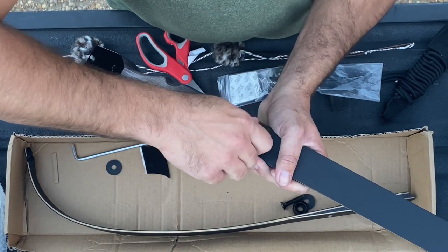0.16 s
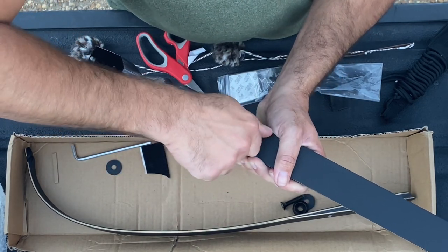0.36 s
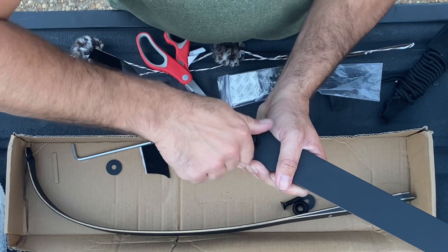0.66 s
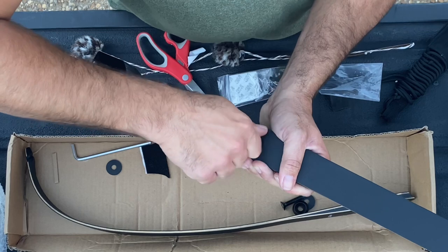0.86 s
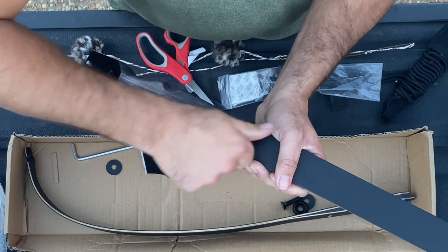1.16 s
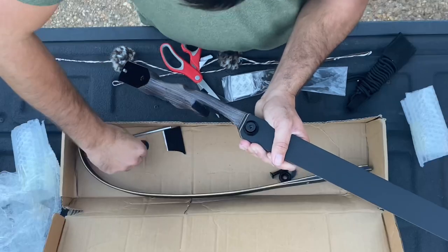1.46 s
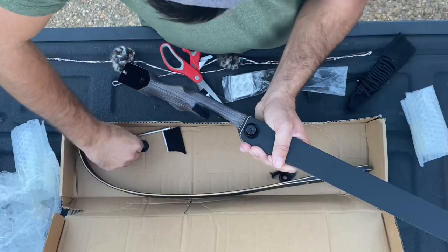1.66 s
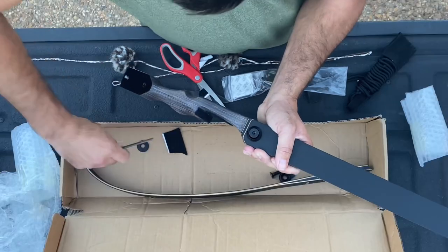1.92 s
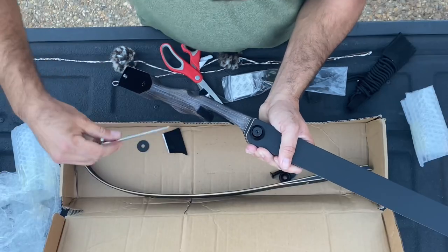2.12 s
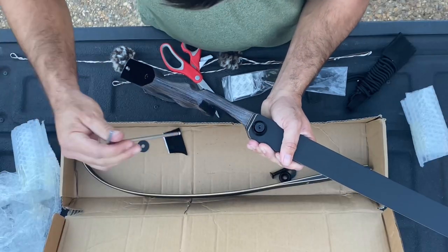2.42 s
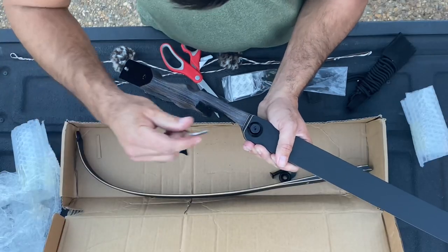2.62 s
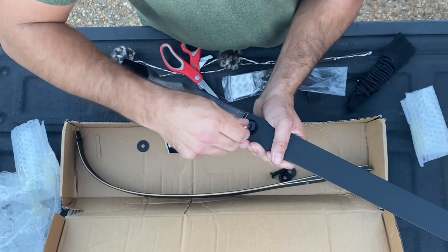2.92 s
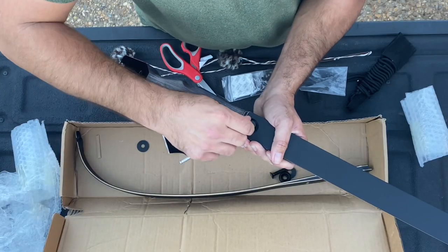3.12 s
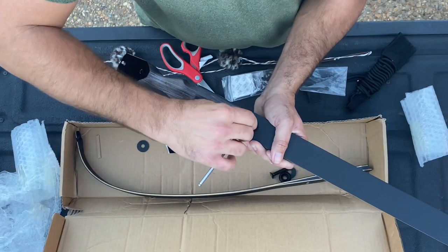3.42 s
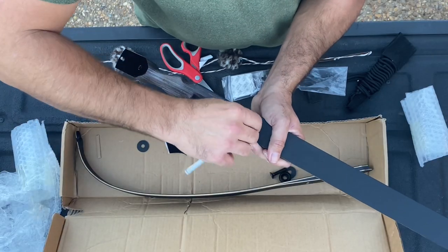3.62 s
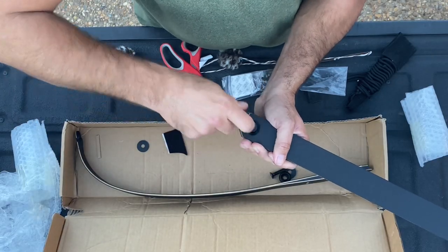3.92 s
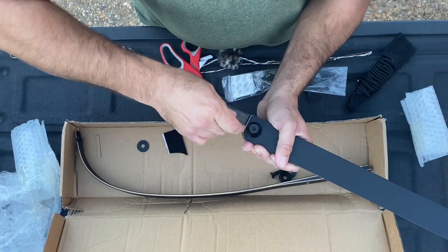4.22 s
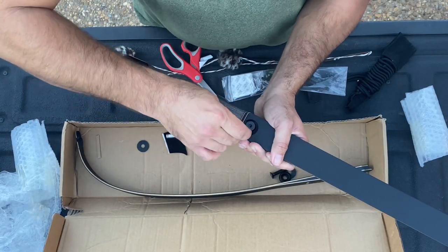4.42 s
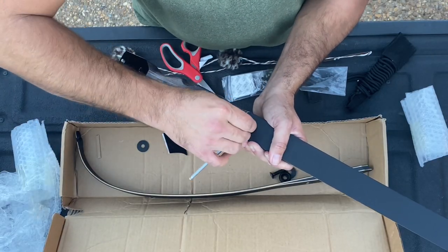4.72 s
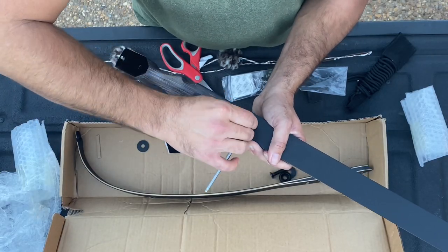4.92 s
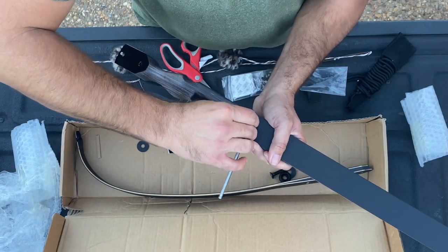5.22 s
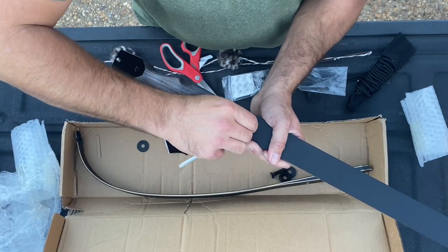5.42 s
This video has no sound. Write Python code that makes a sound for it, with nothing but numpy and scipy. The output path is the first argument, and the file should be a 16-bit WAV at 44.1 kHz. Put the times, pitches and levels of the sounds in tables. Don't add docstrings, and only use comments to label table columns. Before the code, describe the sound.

Beneath everything, a soft low traffic roar with electrical hum and a remote engine slowly rising in pitch, strongest past the middle. Near the phone microphone, a steel bolt taps and scrapes, cardboard thumps and rustles, then a small hex wrench seats with bright clicks, bites once hard, skips and gives faint last ticks. Open air, almost no reverberation, stereo.

```python
import sys
import numpy as np
from scipy import signal
from scipy.fft import rfft, irfft, next_fast_len
from scipy.io import wavfile
from scipy.ndimage import uniform_filter1d, map_coordinates

SR = 44100
rng = np.random.default_rng(int(sys.argv[2]) if len(sys.argv) > 2 else 0)


def store_wav(level_fs):
    pcm = np.round(np.clip(np.atleast_2d(level_fs), -1, 1) * 32767)
    wavfile.write(sys.argv[1], SR, pcm.T.astype(np.int16))


def linear_from_db(decibels):
    return 10 ** (np.asarray(decibels, float) / 20)


N = 245725

# start_s, peak_db, knock_db, ring_db, rattle_t60_s
BOLT_TAPS = [
    (0.2988, -38.5, 2.5, -4, 0.024),
    (0.3311, -51, -4.5, -19, 0.017),
    (.349, -64, -8, -10, .012),
    (0.4474, -60.5, 6, -15, 0.016),
]
BOX_TAPS = [(1.3962, -44.5, 5.5, -14, 0.004), (1.3985, -49.5, 14, -18, .004),
            (1.4085, -48, 12, -9.5, 0.012), (1.418, -54, 2, -4.5, .008), (1.4255, -56, 0, -4, .008),
            (1.4385, -57.5, -2, -1.5, .008), (1.4475, -57.5, -2, 4, .008), (1.4761, -59.5, -10, -10, 0.012),
            (1.482, -58, -6, -8, .01), (1.491, -60, 0, -3, .008), (1.5095, -51, -7, -2, 0.014),
            (1.5128, -43, 8.5, -2.5, 0.013), (1.5195, -56.5, 2.5, -3, .008),
            (1.582, -51.5, -10, -5.5, 0.016), (1.5858, -41.5, 2.5, -7, 0.013),
            (1.5925, -52.5, 13.5, -18.5, 0.007), (1.639, -54.5, 7, -6, 0.005)]
SEAT_TAPS = [
    (2.997, -62, -9, -1, 0.012),
    (3.0024, -36, -13.5, 4.5, .005),
    (3.0038, -36, -8, 3.5, 0.0074),
    (3.0125, -64, -7, 1, .008),
    (3.018, -55, -10.5, 0, .008),
    (3.0335, -59, -2, -10, .01),
    (3.7678, -65.5, 6.5, -8.5, 0.019),
]
TURN_TAPS = [
    (3.0605, -66, 3, -23, 0.0103),
    (3.067, -61, 2, -17.5, .008),
    (3.072, -62, 4, -15, .008),
    (3.0751, -44.5, 2.3, 15, 0.0022),
    (3.0764, -38.5, 2.5, 8, 0.0088),
    (3.0885, -58.5, 3.3, 4, 0.011),
    (3.095, -64, 2, 1, .01),
]
BITE_TAPS = [
    (4.5439, -34.5, -8.5, -5, 0.014),
]
SLIP_TAPS = [
    (4.8388, -50, -3, 1.5, 0.011),
    (4.8418, -57, 6, 0, .008),
    (4.8452, -47, 5.5, -10, 0.0079),
    (4.8485, -51, 3, -4, .008),
]
CATCH_TAPS = [
    (4.575, -68, 2, -8, .02),
    (4.5862, -64, 8.5, -10, .02),
    (4.597, -65, 7, -8, .015),
    (4.6555, -67, -20, -28, 0.015),
    (4.7922, -69, -8, -10, .02),
    (4.8027, -68, -12, -20, 0.015),
    (5.2038, -67.5, 13.5, -4.5, 0.019),
    (5.211, -58, -7.5, -17, 0.014),
    (5.223, -73, 3, -18.5, 0.024),
]
LOOSE_TAPS = [
    (0.8415, -49.5, -10, -35, 0.006),
    (.8462, -51.5, 0, -38, 0.0072),
    (0.8505, -59, 11, -38, 0.014),
    (1.0400, -61, 9, 4, 0.0068),
    (1.0455, -68, 19, -20, 0.014),
    (1.051, -72.5, 20, -22, 0.016),
]
# pitch_hz, width_hz, level_db
BOLT_MODES = [(916, 82, -5.5), (1650, 118, 0), (1835, 87, -6.5), (2097, 115, -4), (3000, 140, -11),
              (3710, 450, -11), (5180, 200, -15.5), (5730, 250, -16.5), (7130, 330, -24.5),
              (8430, 180, -15.5), (10660, 400, -23.5)]
BOX_MODES = [(744, 180, 2.5), (830, 270, 5.5), (1436, 220, 5.5), (2025, 180, 0.5), (2610, 180, 9),
             (4000, 490, -1.5), (5800, 830, -10), (7980, 2200, 0), (13860, 2500, -2.5)]
SEAT_MODES = [(1520, 230, -9), (2340, 170, -5), (2600, 80, 0), (3296, 200, -4), (4330, 65, -17),
              (5022, 280, -5.5), (5380, 170, -2.5), (5785, 270, -1.5), (6300, 200, -15), (7000, 130, -9.5),
              (7400, 97, -9), (7650, 70, -3), (8300, 140, 0.5), (10700, 210, -16)]
TURN_MODES = [(1635, 136.6, 0), (1880, 90, -18), (2100, 62, -8), (3020, 82, -18.5), (3650, 170, -4.5),
              (4570, 200, -10.5), (5430, 130, -18), (5830, 220, -12), (7060, 110, -6), (7470, 110, -5),
              (8540, 110, -14), (9800, 190, -8.5), (10900, 200, -15), (12200, 700, -16)]
BITE_MODES = [(1650, 200, 1), (2090, 87, -2), (2540, 88, -2), (3230, 150, -0.5), (3720, 76, -1),
              (4468, 71, -5), (5445, 94, -13), (5696, 220, 0.5), (6270, 190, -5), (6830, 130, -7),
              (7660, 110, -10.5), (8860, 200, -17)]
SLIP_MODES = [(1610, 130, 4.5), (1910, 64, -8), (2570, 88, -6.5), (3050, 200, -8), (3660, 90, -11),
              (4200, 120, -13), (5800, 160, -11), (7020, 130, -17), (7600, 150, -19.5), (9560, 200, -22)]
CATCH_MODES = [(1620, 200, -3), (2000, 250, -4.5), (2600, 200, -3.5), (3070, 250, 0), (3710, 250, -9),
               (5750, 300, -2.5), (6306, 250, -1.5), (7100, 300, -4)]
LOOSE_MODES = [(1288, 220, -13), (1620, 140, -5), (2390, 230, 2), (3300, 630, -7), (4200, 310, -11),
               (5760, 600, 4), (7200, 600, -7)]

# start_s, peak_db, push_t60_s
KNUCKLE_THUDS = [
    (1.397, -42.5, 0.019),
    (1.409, -45, 0.028),
    (1.426, -51, 0.043),
    (1.443, -56, 0.02),
    (1.513, -57, 0.012),
]
LANDING_THUDS = [
    (1.5866, -38, 0.008),
    (1.5935, -39.5, 0.01),
    (1.5995, -40.5, 0.014),
    (1.609, -47, 0.022),
]
# pitch_hz, width_hz, level_db
PANEL_MODES = [(173, 50, 1.5), (210, 8.6, 11), (309, 12, 3), (415, 67, -10), (510, 81, -2.5),
               (716, 80, -2.5), (990, 240, -10.5)]
LANDING_MODES = [(191, 20, 1), (291, 20, 1.5), (412, 50, -6.5), (554, 80, -4.5), (716, 100, -6),
                 (970, 220, -15.5), (1296, 200, -16)]

# start_s, peak_db, pitch_hz, width_hz
PINGS = [(1.5615, -59, 2500, 300), (1.567, -58, 2600, 300), (1.577, -57, 2500, 350),
         (1.5855, -42, 3470, 490), (1.598, -53, 2600, 300), (1.624, -60.5, 2700, 300),
         (1.631, -54.5, 2600, 250), (1.6388, -53.5, 2850, 250), (4.797, -68, 3400, 200),
         (4.8025, -57, 3080, 130), (4.6555, -70, 3100, 150), (1.0405, -50, 1560, 110),
         (1.5868, -44, 1000, 210), (4.5442, -47.5, 3300, 200), (.8755, -57, 5300, 350),
         (.884, -56, 5800, 350), (.387, -55, 5600, 300)]
# start_s, crack_db, crack modes, ring_db, ring mode; modes as pitch_hz, width_hz, level_db
GLINT = (.2986, -42, [(12300, 900, -6), (13900, 700, 0), (15600, 1200, -4)], -45, [(14000, 90, 0)])

# start_s, hold_s, pressure_db, sizzle_over_rub_db, release_s
GRAZE_STROKES = [
    (.078, 0.023, -73, -17, 0.15),
    (.122, 0.03, -76, -9, 0.15),
    (.165, 0.032, -69.5, -20, 0.16),
]
THREAD_STROKES = [
    (.305, 0.068, -70, -5, 0.18),
    (.376, .008, -67.5, 12, 0.047),
    (.388, 0.024, -55, -0.5, 0.059),
    (.43, 0.024, -72, -5.5, 0.24),
]
FINGER_STROKES = [
    (.47, 0.014, -73, -12, 0.22),
    (.54, 0.061, -80.5, -15, 0.18),
    (.63, 0.0091, -73, -31, 0.12),
    (.7, 0.043, -74, -18, .16),
    (.805, 0.0074, -73.5, -19, 0.063),
]
SPIN_STROKES = [
    (.868, 0.012, -60, -34, 0.097),
    (.879, 0.0074, -75.5, 22, 0.074),
    (.9, 0.013, -72, 10, 0.093),
    (.942, 0.05, -78, 10.5, 0.066),
    (.992, 0.012, -63, -8.5, 0.055),
    (1.02, 0.026, -79.5, -4, .15),
]
SLIDE_STROKES = [
    (1.4, 0.049, -54.5, -5, 0.07),
    (1.478, 0.013, -60, -7, 0.1),
    (1.512, 0.0044, -51.5, -5.5, 0.064),
    (1.535, 0.064, -60.5, -19, 0.091),
    (1.59, 0.0078, -66, -7, 0.056),
    (1.625, 0.035, -68, -12.5, 0.12),
]
SOCKET_STROKES = [
    (3.01, 0.0059, -55.5, -2, 0.051),
    (3.026, 0.015, -77, 2, 0.23),
    (3.065, 0.01, -54, -14, 0.1),
    (4.535, .02, -68, -10.5, 0.2),
    (4.588, 0.018, -72, -16, 0.1),
    (4.63, 0.14, -88, -18, .1),
    (4.795, 0.019, -71, -14.5, 0.19),
    (4.852, 0.0024, -65.5, -18, 0.1),
    (5.206, 0.016, -75.5, -26.5, 0.083),
]
SHIVER_STROKES = [
    (3.085, .012, -78, 5.68, 0.23),
]
# pitch_hz, width_hz, level_db
WASHER_RUB = [(1600, 300, -1.5), (3020, 480, 0.5), (3710, 650, -3.5)]
WASHER_SIZZLE = [(5300, 600, -7.5), (6700, 300, -5.5), (7400, 150, 0)]
THREAD_RUB = [(2560, 830, -2), (3420, 340, 2.5), (4030, 760, -4.5)]
THREAD_SIZZLE = [(5530, 500, 1.5), (7630, 1400, -4), (9500, 1800, -7.5), (14200, 1200, -16)]
SKIN_RUB = [(1620, 350, 5.5), (2600, 530, 2.5), (3500, 1000, -8)]
SPIN_RUB = [(2570, 340, 1.5), (3250, 540, 0.5), (3830, 600, 0.5)]
SPIN_SIZZLE = [(5150, 450, -1), (6380, 500, -1.5), (7050, 650, -2.5), (8400, 700, -7.5), (9700, 900, -11.5),
               (14300, 2000, -21)]
CARD_RUB = [(397, 170, 1.5), (1055, 370, -3), (1400, 160, 2.5), (2340, 560, 2), (2734, 1470, -3.5)]
CARD_SIZZLE = [(5560, 900, -0.5), (7300, 1500, -2.5), (9500, 2200, -5.5), (14800, 1800, -10.5)]
STEEL_RUB = [(1870, 400, -1), (2570, 520, -0.5), (3360, 220, -3.5), (4030, 560, -9.5)]
STEEL_SIZZLE = [(5350, 510, 4.5), (7700, 110, 4.5), (7800, 380, -3.5), (10420, 600, -18.5)]
SHIVER_SIZZLE = [(5900, 500, -6.5), (7470, 220, 0.5), (9694, 600, -9.5)]

# start_s, pitch_hz, level_db
ENGINE = [(0, 72.25, -53.5), (.34, 73.83, -56), (.62, 77.4, -49), (.85, 78, -56), (1.0, 78.63, -53.5),
          (1.3, 78.62, -56.5), (1.6, 77.5, -58), (2.0, 79.64, -61), (2.26, 82.6, -50), (2.4, 85.9, -49),
          (2.6, 90.73, -42.5), (3.23, 92.6, -43), (3.7, 94.54, -36.5), (3.88, 94.46, -40),
          (4.62, 97.27, -43), (4.97, 97.66, -47.5), (5.08, 98.3, -41.5), (5.57, 99.95, -49)]
# centre_s, peak_db, half_length_s
SWELLS = [(0.457, -68, 0.27), (0.799, -63, 0.41), (0.914, -64.5, 0.33), (.92, -65, 0.22), (2.75, -62, 0.36),
          (2.9, -68.5, 0.43), (3, -64.5, 0.34), (3.3, -63.5, 0.58), (3.398, -65.5, 0.66), (3.7, -63, .56),
          (4.54, -60, 0.27), (5.105, -66.5, .62), (5.198, -70, 0.65), (5.234, -62.5, .4),
          (5.335, -61.5, 0.41)]
SWELL_SIXTHS = [47, 21, 28, 41, 18, 14, 24, 20, 23, 18, 18, 16, 12, 18, 21]
# start_s, level_db
ROAD = [
    (0, -59),
    (2.7, -58.5),
    (4.5, -56),
    (5.57, -56),
]
# pitch_hz, density_db
ROAD_COLOUR = [(20, -23), (40, -8), (60, 2.5), (100, -2), (170, -13.5), (300, -12.5), (420, -18.5),
               (700, -13), (1000, -19.5), (1600, -29), (2200, -38.5), (2700, -48.5), (4000, -61),
               (8000, -82.5)]
# start_s, level_db
HUM = [
    (0, -63),
    (.7, -55),
    (1.95, -58.5),
    (2.4, -67.5),
    (4.2, -71.5),
    (5.0, -62.5),
    (5.57, -74.5),
]
# pitch_hz, width_hz, level_db
DRONES = [
    (55.3, 2.4, -58.5),
    (216.1, 3.5, -71),
]
# pair of pitch_hz, level_db, start_s
WHINE = ((11930, 12090), -107, 2.2)

# pitch_hz, likeness, left_lead_rad, left_over_right_db
FAR_PORTS = [(30, 1, 0.05, 0), (80, 1, 0.08, 0), (151, 0.98, 0.05, .2), (285, .8, 0.51, 0),
             (595, .7, 1.74, 4.5), (1130, 0.71, 2.5, 5), (2200, 0.18, 1.5, 1.5)]
NEAR_PORTS = [(199.5, .91, .1, -2), (1520, 0.93, .1, -1), (2100, 1, 0.43, 0), (2740, 1, 1.66, -1),
              (3540, 0.97, 0.93, -6), (4260, .7, 1.4, -6), (4630, .8, 2.1, -4), (5040, 0.67, 1.5, -0.5),
              (5600, 0.79, .5, -2), (6800, 1, 1.0, -0.5), (8300, 1, 1.6, 0.5), (10200, 1, 1.9, 2),
              (11600, 0.9, 3, 0), (12500, 1, 2.5, 1), (13920, 0.93, 3.2, 0.5), (16000, 0.91, 2.9, -0.5)]
# pitch_hz, level_db
SHADOW = [(9500, 0), (11200, -4), (12300, -7), (13600, -1), (15000, 0), (16200, -10)]
# pitch_hz, density_db
HISS = [(1500, -4.5), (4000, -0.5), (7000, -5.5), (10300, -11), (11200, -20), (12000, -45), (16000, -70)]


def unit(x):
    return x / np.sqrt(np.mean(x ** 2) + 1e-20)


def along(points, hz):
    f, *cols = np.transpose(points)
    return [np.interp(np.log(hz + 1), np.log(f + 1), c) for c in cols]


def curves(rows):
    s, *cols = np.transpose(rows)
    return [np.interp(np.arange(N) / SR, s, c) for c in cols]


def wobble(rate, hop=1):
    coarse = np.arange(0, N + 16, 16)
    knots = rng.standard_normal(int(N * rate / SR) + 4)
    return np.interp(np.arange(0, N, hop), coarse, map_coordinates(knots, [coarse * rate / SR]))


def filtered(x, response):
    n = x.shape[-1]
    m = next_fast_len(n + 8192)
    return irfft(rfft(x, m) * response(np.fft.rfftfreq(m, 1 / SR)), m)[..., :n]


def coloured(x, colour):
    return filtered(x, lambda hz: linear_from_db(along(colour, hz)[0]))


def resonances(modes):
    def response(f):
        total = 0
        for k, (centre, width, db) in enumerate(modes):
            damping = 1j * f * width
            total = total + (-1) ** k * linear_from_db(db) * damping / (centre * centre - f * f + damping)
        return total
    return response


def hands():
    blows = steel() + taps(BOX_TAPS, BOX_MODES, blow=5.9) + thuds() + pings()
    return blows + walls(blows) + sliding()


def steel():
    wrench = taps(SEAT_TAPS, SEAT_MODES, blow=1.5)
    wrench += taps(TURN_TAPS, TURN_MODES, blow=2.5)
    wrench += taps(BITE_TAPS, BITE_MODES, blow=8.5)
    wrench += taps(SLIP_TAPS, SLIP_MODES, blow=2.8)
    wrench += taps(CATCH_TAPS, CATCH_MODES, blow=4.2)
    wrench += taps(LOOSE_TAPS, LOOSE_MODES, blow=3.24)
    wrench_band = signal.butter(3, (1350, 12500), "band", fs=SR, output="sos")
    struck = taps(BOLT_TAPS, BOLT_MODES, blow=12) + signal.sosfilt(wrench_band, wrench)
    small = signal.butter(3, 1150, "high", fs=SR, output="sos")
    return signal.sosfilt(small, struck)


def taps(events, modes, blow):
    out = np.zeros((2, N + 4096))
    bands_hz = (0, 2200), (2200, 4900), (4900, SR)
    groups = [[m for m in modes if lo < m[0] <= hi] for lo, hi in bands_hz]
    for s, db, knock_db, ring_db, t60 in events:
        hit = 0
        for group, extra_db in zip(groups, (knock_db, 0, ring_db)):
            hit = hit + linear_from_db(db + extra_db) * rattle(group, t60, rise=.0007, blow=blow)
        out[:, round(s * SR):][:, :hit.shape[1]] += hit
    return out[:, :N]


def rattle(modes, t60, rise, blow):
    t = np.arange(4096) / SR
    burst = rng.standard_normal((2, 1, len(t))) * linear_from_db(-60 * t / t60) * (1 - np.exp(-t / rise))
    burst[..., round(rise * SR)] += blow
    f = np.fft.rfftfreq(len(t), 1 / SR)
    rings = irfft(rfft(burst) * [resonances([mode])(f) for mode in modes], len(t))
    _, width, db = np.transpose(modes)
    strength = (-1) ** np.arange(len(modes)) * linear_from_db(db) * np.sqrt(width) / np.linalg.norm(rings, axis=2)
    ring = (strength[..., None] * rings).sum(axis=1)
    return ring / np.abs(ring).max(axis=1, keepdims=True)


def thuds():
    out = np.zeros((2, N))
    for events, modes in ((KNUCKLE_THUDS, PANEL_MODES), (LANDING_THUDS, LANDING_MODES)):
        for s, db, t60 in events:
            boom = linear_from_db(db) * rattle(modes, t60, rise=0.0012, blow=7.6)
            out[:, round(s * SR):][:, :boom.shape[1]] += boom
    return out


def pings():
    out, t = np.zeros((2, N)), np.arange(2048) / SR
    for s, db, hz, width in PINGS:
        shape = np.exp(-np.pi * width * t) * (1 - np.exp(-(t / 0.0011) ** 2))
        tick = linear_from_db(db) * shape / shape.max() * np.sin(2 * np.pi * (hz * t + rng.random((2, 1))))
        out[:, round(s * SR):][:, :len(t)] += tick
    return out


def walls(near):
    t = np.arange(6000) / SR
    echo = rng.standard_normal((2, len(t))) * linear_from_db(-60 * t / 0.059) * (t > .003)
    echo /= np.linalg.norm(echo[0])
    return linear_from_db(-12.5) * signal.fftconvolve(near, echo, axes=1)[:, :N]


def sliding():
    out = friction(pressure(GRAZE_STROKES, rise_s=0.067), WASHER_RUB, WASHER_SIZZLE, grit_db=1.0, clump_db=3)
    out += friction(pressure(THREAD_STROKES, rise_s=0.019), THREAD_RUB, THREAD_SIZZLE, grit_db=2.2, clump_db=.6)
    out += friction(pressure(SPIN_STROKES, rise_s=.03), SPIN_RUB, SPIN_SIZZLE, grit_db=2.4, clump_db=.6)
    out += friction(pressure(SHIVER_STROKES, rise_s=.02), STEEL_RUB, SHIVER_SIZZLE, grit_db=0, clump_db=3)
    out += friction(pressure(FINGER_STROKES, rise_s=0.12), SKIN_RUB, THREAD_SIZZLE, grit_db=0, clump_db=1.5)
    out += friction(pressure(SLIDE_STROKES, rise_s=0.028), CARD_RUB, CARD_SIZZLE, grit_db=2.6, clump_db=0.8)
    out += friction(pressure(SOCKET_STROKES, rise_s=0.024), STEEL_RUB, STEEL_SIZZLE, grit_db=2.5, clump_db=1.5)
    return out


def pressure(strokes, rise_s):
    level, t = np.zeros((2, N)), np.arange(N) / SR
    for s, hold, db, sizzle_db, fall in strokes:
        span = slice(max(round((s - rise_s) * SR), 0), round((s + hold + fall) * SR))
        off = np.maximum((s - t[span]) / rise_s, (t[span] - s - hold) / fall)
        level[:, span] += linear_from_db([[db], [db + sizzle_db]]) * linear_from_db(-60 * np.maximum(off, 0))
    return level


def friction(level, low_modes, high_modes, grit_db, clump_db):
    size = [linear_from_db(grit_db * wobble(900) + clump_db * wobble(90)) for _ in level]
    grit = rng.standard_normal((2, 2, N)) * np.array(size)[:, None]
    rub = unit(filtered(grit[0], resonances(low_modes)))
    sizzle = unit(filtered(grit[1], resonances(high_modes)))
    return level[0] * rub + level[1] * sizzle


def glint():
    s, crack_db, modes, ring_db, mode = GLINT
    tick = linear_from_db(crack_db) * rattle(modes, .006, .0004, 4)[0] * np.array([[1], [-.1]])
    tick += linear_from_db(ring_db) * rattle(mode, .003, .0004, 6)[0] * np.array([[1], [-.95]])
    return np.pad(tick, ((0, 0), (round(s * SR), N)))[:, :N]


def engine():
    hop = 8
    fade_db, clear_db, fade_span_db = 1.5, -44.5, 8.5
    order_db, load_share = -81.5, 0.028
    hz, level_db = (c[::hop] for c in curves(ENGINE))
    t = np.arange(0, N, hop) / SR
    turns = np.cumsum(hz) * hop / SR + 0.0061 * wobble(23, hop)
    cycles = turns / 6
    faint = np.clip((clear_db - level_db) / fade_span_db, 0, 1)
    firing_db = level_db + (-0.5 + fade_db * faint) * wobble(10, hop)
    out = np.sqrt(2) * linear_from_db(firing_db) * np.sin(2 * np.pi * turns)
    load_db = load_share * (level_db - level_db.mean())
    for sixth in range(7, 30):
        gain = linear_from_db(order_db + load_db + 6.67 * wobble(2.492, hop))
        out += gain * np.sin(2 * np.pi * (cycles * sixth + rng.random()))
    for sixth, (s, db, half) in zip(SWELL_SIXTHS, SWELLS):
        swell = np.exp(-((t - s) / half) ** 2)
        gain = np.sqrt(2) * linear_from_db(db + 1.5 * wobble(9, hop)) * swell
        out += gain * np.sin(2 * np.pi * (cycles * sixth + rng.random()))
    return signal.resample_poly(out, hop, 1, padtype="line")[:N]


def road():
    z = signal.stft(rng.standard_normal((2, N)), nperseg=1024)[2]
    patches = uniform_filter1d(rng.standard_normal(z.shape[1:]), 5, axis=0)
    patches = uniform_filter1d(patches, 8, axis=1)
    pair = signal.istft(z * linear_from_db(1.5 * unit(patches)), nperseg=1024)[1][:, :N]
    return linear_from_db(curves(ROAD)[0] + 5.0) * unit(coloured(pair, ROAD_COLOUR))


def hum():
    hz = 119.3 + 1.2 * wobble(1.5)
    level_db = curves(HUM)[0] + 1.6 * wobble(3.4)
    out = np.sqrt(2) * linear_from_db(level_db) * np.sin(2 * np.pi * np.cumsum(hz) / SR)
    for centre, width, db in DRONES:
        out += linear_from_db(db) * unit(filtered(rng.standard_normal(N), resonances([(centre, width, 0)])))
    return out


def whine():
    tones_hz, db, start = WHINE
    t = np.arange(N) / SR
    pair = sum(np.sin(2 * np.pi * hz * t) for hz in tones_hz)
    return linear_from_db(db + wobble(2)) * pair * np.clip((t - start) / .4, 0, 1)


def hiss():
    return linear_from_db(-89.5) * unit(coloured(rng.standard_normal((2, N)), HISS))


def ports(shared, own, table):
    def response(hz):
        alike, lead, balance_db = along(table, hz)
        turn = np.arccos(np.clip(alike, 0, 1)) / 2
        left = linear_from_db(balance_db / 2) * np.exp(.5j * lead)
        together = [np.cos(turn) * left, np.cos(turn) / left]
        opposed = [np.sin(turn) * left, -np.sin(turn) / left]
        return np.array([together, opposed])
    edge = 2048
    pair = np.pad([shared, own], ((0, 0), (edge, edge)), "reflect", reflect_type="odd")
    return filtered(pair[:, None], response).sum(axis=0)[:, edge:-edge]


def scene():
    near = ports(*coloured(hands(), SHADOW), NEAR_PORTS)
    roar = road()
    far = ports(roar[0] + engine() + hum(), roar[1], FAR_PORTS)
    return near + glint() + far + whine() + hiss()


def top_cut(x):
    return signal.sosfilt(signal.butter(12, 16440, fs=SR, output="sos"), x)


def record(dry):
    fade = np.clip((N - np.arange(N)) / (.004 * SR), 0, 1)
    return top_cut(dry * fade)


dry = scene()
out = record(dry)
store_wav(out)
```